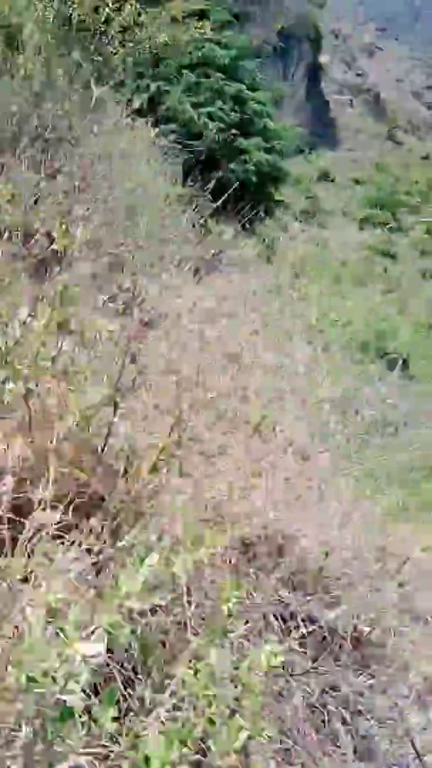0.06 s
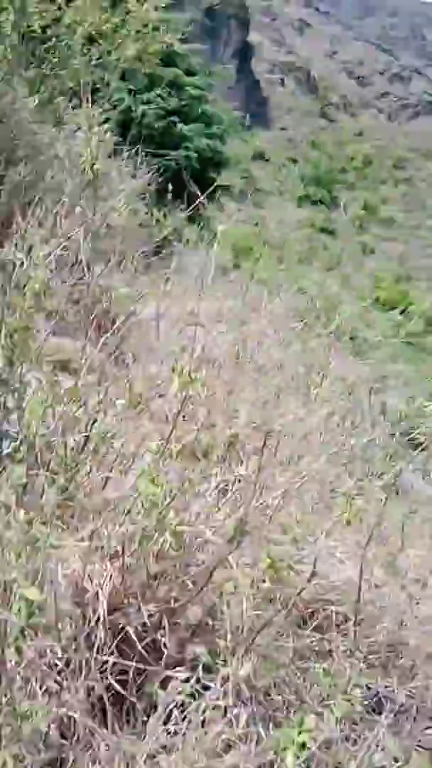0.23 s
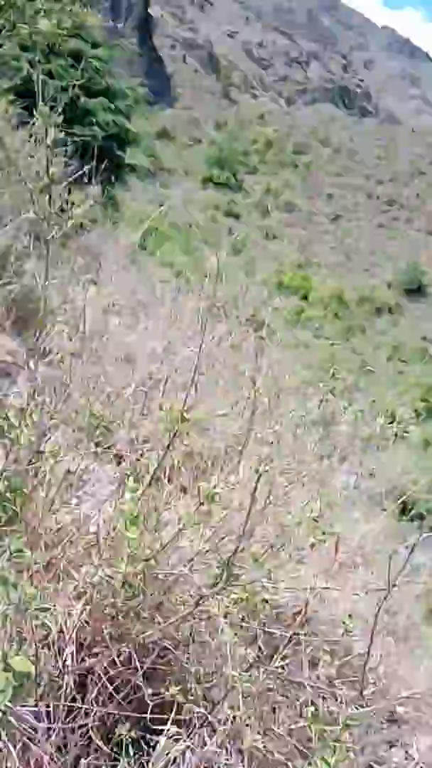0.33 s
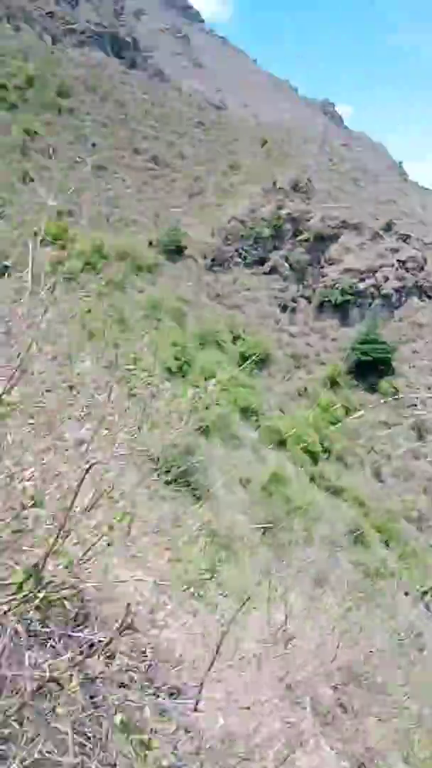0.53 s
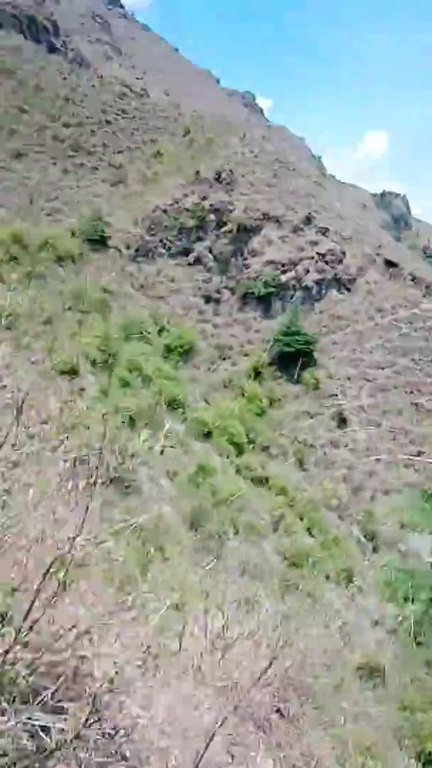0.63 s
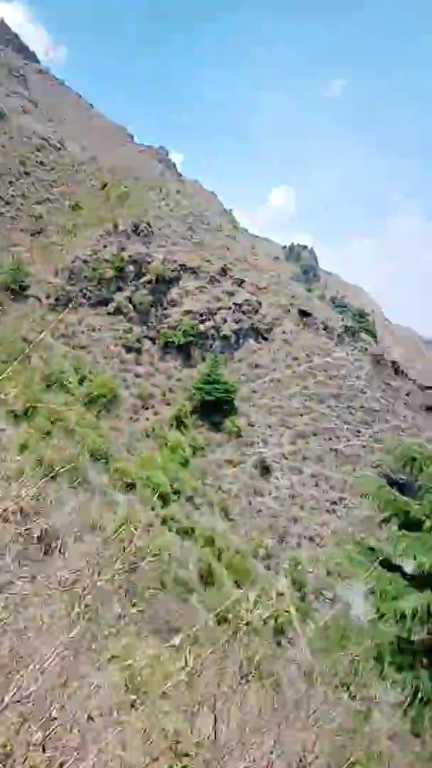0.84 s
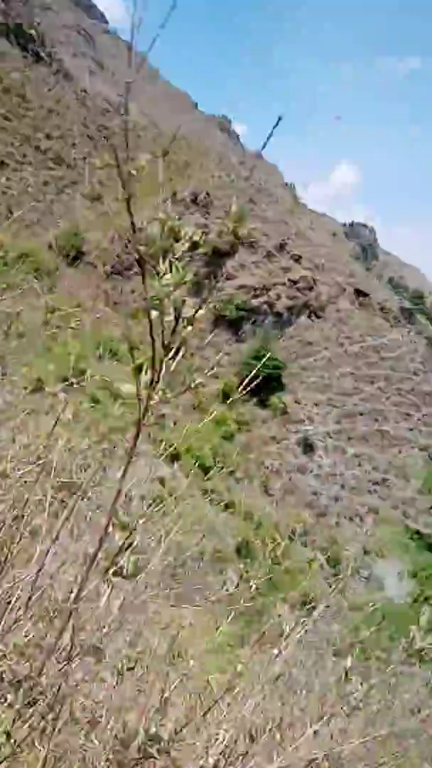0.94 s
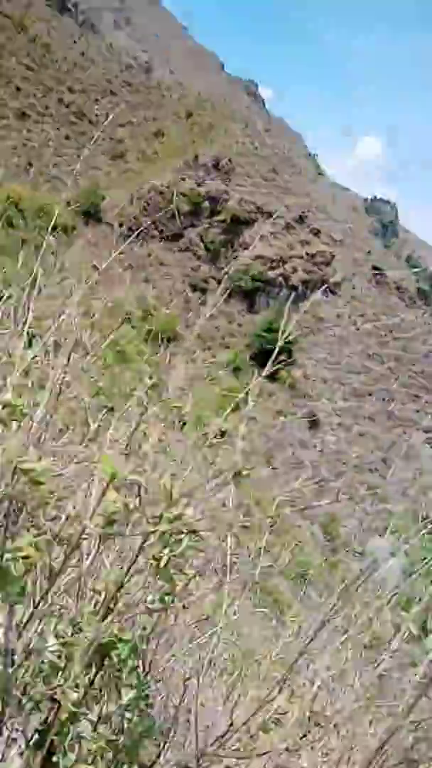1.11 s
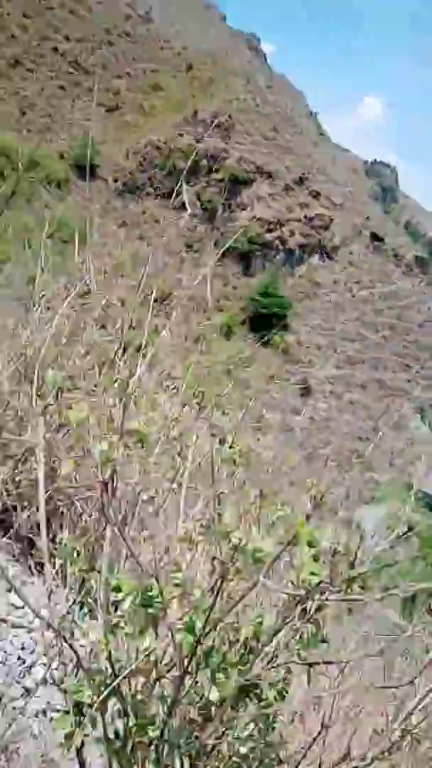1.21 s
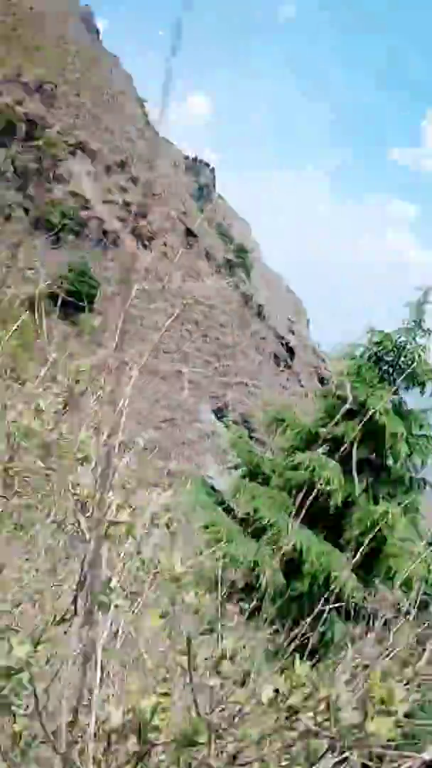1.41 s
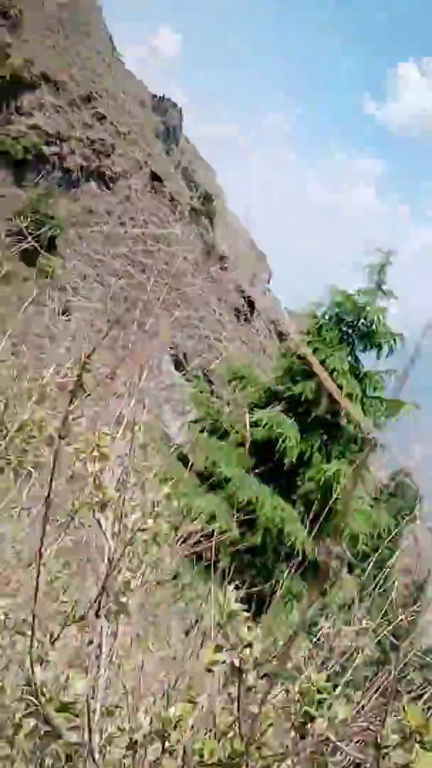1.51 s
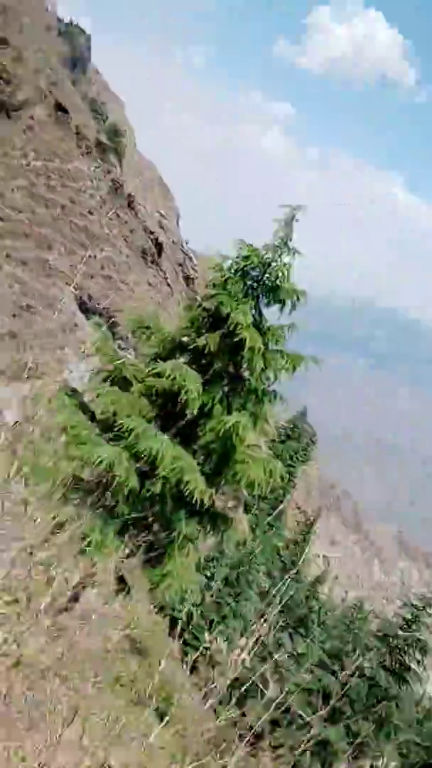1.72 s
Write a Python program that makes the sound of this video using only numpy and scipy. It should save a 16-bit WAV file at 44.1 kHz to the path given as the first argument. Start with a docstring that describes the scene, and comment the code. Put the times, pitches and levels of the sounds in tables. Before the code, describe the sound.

Footsteps crunch through dry grass and brush, with twigs snapping underfoot.

```python
"""Footsteps in dry brush

Someone walks through dry grass on an open hillside, holding a phone. Each footfall crushes soil and
straw in a cloud of tiny fractures; clods thud and twigs snap, ringing in damped modes. Friction makes
the grass swish, stems scratch and soles scuff. Wind rumbles faintly, and one knock thumps the phone."""
import sys
import numpy as np
from scipy import signal
from scipy.fft import rfft, irfft, next_fast_len
from scipy.io import wavfile
from scipy.ndimage import map_coordinates

SR = 44100
rng = np.random.default_rng(int(sys.argv[2]) if len(sys.argv) > 2 else 0)


def generate_wav(signal):
    """Clip the signal to [-1, 1] and save it as 16-bit WAV at the path in sys.argv[1]."""
    frames = np.transpose(np.atleast_2d(signal))
    scaled = np.clip(frames, -1, 1) * 32767
    pcm = np.round(scaled).astype(np.int16)
    wavfile.write(sys.argv[1], SR, pcm)


N = 77175

# Crunches underfoot. Each row: start, attack, hold and time to fall 20 dB, all in seconds,
# levels of soil, stalks and straw in dB, pitch factor of soil and stalks.
CRUNCHES = [(0, .015, .12, .05, -57, -67, -71, 1.04), (.187, .008, .05, .055, -58, -51, -57, 1),
            (.207, .004, .014, .02, -44, -45, -52, 1.03), (.49, .05, .06, .07, -54, -53, -63, 1),
            (.546, .006, .018, .022, -44, -41, -50, 1), (.585, .004, .02, .06, -50, -51, -58, .97),
            (.633, .004, .016, .02, -50, -50, -56, 1), (.666, .003, .016, .035, -47, -46, -53, 1),
            (.70, .02, .11, .05, -67, -64, -69, 1), (.846, .008, .046, .025, -51, -49, -55, .95),
            (1.036, .016, .045, .07, -61, -53, -55, .9), (1.15, .07, .05, .09, -61, -56, -63, 1.05),
            (1.226, .005, .002, .004, -46, -39, -47, .9), (1.315, .028, .026, .025, -60, -51, -53, 1.06),
            (1.38, .01, .036, .03, -56, -55, -57, 1), (1.43, .01, .05, .07, -59, -61, -68, 1)]
# Grass against the legs. Each row: time in seconds, rustle level in dB, hiss level in dB.
SWISH_LEVELS = [(0, -63, -62), (.23, -60, -61), (.325, -66, -66), (.405, -65, -65), (.54, -60, -60),
                (.81, -61, -61), (.98, -57, -56), (1.26, -59, -59), (1.31, -61, -66), (1.5, -61, -63),
                (1.62, -80, -66), (1.665, -86, -79), (1.72, -77, -67)]
# Wind on the microphone. Each row: time in seconds, level in dB.
WIND_LEVELS = [(0, -73), (.12, -61), (.2, -74), (.29, -60), (.36, -63), (.48, -54), (.58, -60), (.66, -75),
               (.77, -92), (1.18, -94), (1.27, -66), (1.33, -80), (1.5, -95), (1.63, -95), (1.66, -76),
               (1.75, -68)]
# Clods that give way. Each row: start in seconds, peak level in dB, pitch factor.
CLODS = [(.0305, -42, 1.15), (.1025, -42, 1.1), (.111, -44, .95), (.125, -44, .85), (.207, -43, .85)]
# Twig snaps. Each row: start in seconds, relative levels of body, crack, tick and edge in dB,
# pitch factor.
SNAPS = [(.0307, -52, -54, -50, -36, 1), (.0735, -54, -40, -44, -52, 1.1), (.1036, -54, -44, -46, -41, .85),
         (.1566, -62, -40, -38, -50, 1.1), (.3403, -54, -35, -38, -42, 1.05),
         (.3447, -49, -22, -23, -39, 1.05), (.552, -39, -33, -44, -54, 1), (.7105, -58, -34, -52, -62, 1.1),
         (.85, -41, -38, -39, -48, 1), (.896, -38, -28, -45, -58, .82), (1.036, -39, -36, -48, -56, .95),
         (1.059, -29, -26, -48, -62, .9), (1.081, -41, -40, -37, -52, 1), (1.145, -62, -44, -38, -35, 1.05),
         (1.2313, -39, -28, -33, -43, 1), (1.2328, -35, -19, -26, -42, .94),
         (1.123, -52, -39, -48, -56, .9), (.449, -52, -42, -56, -60, 1.05), (1.355, -58, -46, -31, -52, 1),
         (1.3917, -48, -32, -32, -45, 1), (1.4172, -49, -33, -28, -47, 1.02)]
# Stems scratching past. Each row: start in seconds, time to fall 20 dB in seconds, level in dB.
SCRATCHES = [(.103, .02, -51), (.198, .012, -48), (.337, .007, -37), (1.15, .013, -43), (1.167, .015, -50),
             (1.199, .011, -42), (1.2565, .012, -45), (1.272, .012, -50), (1.4645, .017, -47),
             (1.478, .022, -50), (1.493, .02, -53)]
# Drags of the sole. Each row: start, attack, hold and time to fall 20 dB, all in seconds,
# levels of the hollow note and the rasp in dB.
SCUFFS = [(.405, .075, .06, .05, -56, -55), (1.5, .02, .1, .06, -88, -72), (1.665, .04, .04, .05, -85, -65)]

# Spectra of the noisy sources. Each row: frequency in Hz, relative level in dB.
SOIL_SPECTRUM = [(50, -48), (130, -12), (200, -3), (300, 0), (420, -2), (550, 1), (760, -4), (950, -9),
                 (1150, -8), (1600, -22), (4000, -50)]
STALK_SPECTRUM = [(100, -60), (500, -35), (1000, -15), (1350, -9), (1700, -5), (2080, 0), (2400, 1),
                  (2750, -6), (3200, -13), (4500, -26), (9000, -50)]
STRAW_SPECTRUM = [(200, -55), (1500, -30), (3200, -9), (4100, 0), (5000, -5), (6500, -6), (7300, -19),
                  (8500, -23), (10500, -16), (16000, -19)]
RUSTLE_SPECTRUM = [(90, -50), (200, -21), (320, -10), (550, -1), (950, -2), (1700, -2), (2350, 5.5),
                   (3200, -4), (4200, 0), (5500, -2), (6600, -4), (7400, -14), (16000, -24)]
HISS_SPECTRUM = [(200, -45), (3600, -8), (5400, 1), (6600, -1), (7300, -7), (8500, -9), (10300, 0),
                 (13500, -3), (15400, -1)]
WIND_SPECTRUM = [(15, -44), (35, -21), (58, 0), (85, -1), (120, -4), (175, -20), (300, -48), (1500, -80)]
STEM_SPECTRUM = [(150, -32), (1200, -12), (2400, -1), (3300, -5), (6300, 0), (8200, -13), (10200, 0),
                 (13500, -1), (15300, 4)]
HOLLOW_SPECTRUM = [(100, -45), (300, -25), (440, -11), (530, 0), (620, -9), (800, -13), (1200, -27),
                   (4000, -55)]
RASP_SPECTRUM = [(300, -45), (1200, -22), (1750, -13), (2050, 0), (2400, -1), (2800, -10), (3400, -21),
                 (9000, -45)]

# Modes of a clod, then of the four parts of a snap from low to high. Each row: frequency in Hz at
# pitch factor 1, relative level in dB, time to fall 60 dB in seconds.
CLOD_MODES = [(225, 0, .018), (340, -6, .012)]
BODY_MODES = [(390, -6, .011), (540, 0, .014), (760, -7, .008)]
CRACK_MODES = [(1130, -14, .006), (1500, -10, .007), (2060, 0, .009), (2420, -2, .009), (2950, -9, .005)]
TICK_MODES = [(3800, 0, .005), (4450, -1, .004), (5400, -5, .0035), (6300, -5, .004)]
EDGE_MODES = [(10200, 0, .003), (12200, -3, .002), (14300, -1, .003)]


def undb(db):
    """Amplitude grows tenfold for every 20 dB."""
    return 10 ** (np.asarray(db) / 20)


def unit(x):
    """Normalisation to an rms of 1."""
    return x / np.sqrt(np.mean(x ** 2))


def curve(points):
    """Gain over time, interpolated in decibels between (s, dB) points."""
    return undb(np.interp(np.arange(N) / SR, *np.array(points).T))


def colour(x, spectrum):
    """A minimum-phase filter imposes a spectrum on the excitation; the result has rms 1."""
    hz, db = np.array(spectrum).T
    size = 2 * next_fast_len(N)
    freqs = np.maximum(np.arange(size // 2 + 1) * SR / size, 1)
    magnitude = undb(np.interp(np.log(freqs), np.log(hz), db))
    cepstrum = irfft(np.log(magnitude))
    cepstrum[1:size // 2] *= 2  # folding onto positive time makes the filter causal
    cepstrum[size // 2 + 1:] = 0
    response = np.exp(rfft(cepstrum))
    return unit(irfft(rfft(x, size) * response)[:N])


def wander(per_s):
    """Slow noise of rms 1, interpolated between random values."""
    points = rng.standard_normal(N)
    return unit(np.interp(np.arange(N) / SR * per_s, np.arange(N), points))


def resample(x, speed):
    """Reading a signal faster raises all its frequencies in proportion."""
    return map_coordinates(x, [np.cumsum(speed)], mode="mirror")


def waver(x, depth=.025):
    """Frequency modulation: resonances drift up and down as the contact moves."""
    return resample(x, 1 + depth * wander(per_s=25))


def grains(per_s, spread_db):
    """Shot noise of rms 1: tiny fractures are impulses of random time, size and sign."""
    sizes = undb(spread_db * np.clip(rng.standard_normal(N), -2, 2))
    occurs = rng.random(N) < per_s / SR
    return unit(occurs * sizes * rng.choice([-1, 1], N))


def envelope(start, attack, hold, release):
    """A linear rise and a hold, then exponential decay of 20 dB per release time."""
    t = np.arange(N) / SR - start
    return np.clip(t / attack, 0, 1) * undb(-20 * np.maximum(t - attack - hold, 0) / release)


def ring(modes, pitch):
    """Free vibration is a sum of damped modes, radiating little below the lowest; the peak is 1."""
    t = np.arange(SR // 20) / SR
    vibration = sum((-1) ** k * undb(db - 60 * t / t60) * np.sin(2 * np.pi * hz * pitch * t)
                    for k, (hz, db, t60) in enumerate(modes))
    cutoff_hz = .72 * modes[0][0] * pitch
    radiated = signal.lfilter(*signal.butter(3, cutoff_hz, "high", fs=SR), vibration)
    return radiated / np.abs(radiated).max()


def place(sound, start):
    """A pure delay sets a short sound at its start in seconds."""
    return np.interp(np.arange(N) - start * SR, np.arange(len(sound)), sound, left=0, right=0)


def footfalls(clump_db=1.8):
    """Brittle fracture: soil, stalks and straw break in clumps, and overlapping crunches add in power."""
    rows = np.array(CRUNCHES)
    power = np.array([envelope(*row[:4]) ** 2 for row in rows])
    # Each patch of ground has its own pitch; overlaps take the power-weighted mean.
    pitch = np.average(rows[:, 7:], axis=0, keepdims=True) if len(rows) == 1 else None
    weights = power + 1e-12
    pitch = rows[:, 7] @ weights / weights.sum(axis=0)
    soil = colour(grains(per_s=2500, spread_db=4), SOIL_SPECTRUM)
    fractures = grains(per_s=3000, spread_db=4)
    stalks = waver(colour(fractures, STALK_SPECTRUM))
    straw = colour(fractures, STRAW_SPECTRUM)
    layers = np.array([resample(soil, pitch), resample(stalks, pitch), straw])
    gains = np.sqrt(undb(rows[:, 4:7]).T ** 2 @ power)
    clumps = unit(undb(clump_db * wander(per_s=190)))
    return (layers * gains).sum(axis=0) * clumps


def grass(clump_db=1.6):
    """Friction between blades makes a rustle and a fine hiss, sprinkled with crackles."""
    friction = grains(per_s=5000, spread_db=6) + .7 * rng.standard_normal(N)
    crackles = .55 * grains(per_s=110, spread_db=4)
    rub = (friction + crackles) * undb(clump_db * wander(per_s=110))
    levels = np.array(SWISH_LEVELS)
    rustle = colour(rub, RUSTLE_SPECTRUM) * curve(levels[:, [0, 1]])
    hiss = colour(rub, HISS_SPECTRUM) * curve(levels[:, [0, 2]])
    return rustle + hiss


def wind():
    """Turbulence in light air buffets the microphone with low-frequency pressure noise."""
    return colour(rng.standard_normal(N), WIND_SPECTRUM) * curve(WIND_LEVELS)


def clods():
    """Lumps of earth give way; heavy damping of their low modes leaves a soft thud."""
    return sum(undb(db) * place(ring(CLOD_MODES, pitch), start) for start, db, pitch in CLODS)


def twigs(gain_db=-3, splinter_gain=.14, splinter_decay_s=.0022):
    """Impulse excitation: one break and a brief spray of splinters set each twig's modes ringing."""
    t = np.arange(SR // 50) / SR
    parts = (BODY_MODES, CRACK_MODES, TICK_MODES, EDGE_MODES)
    snaps = np.zeros(N)
    for start, *part_db, pitch in SNAPS:
        splinters = rng.standard_normal(len(t)) * (rng.random(len(t)) < .5)
        fracture = splinter_gain * splinters * np.exp(-t / splinter_decay_s)
        fracture[0] = 1  # the main break
        wood = sum(undb(db) * ring(modes, pitch) for db, modes in zip(part_db, parts))
        snaps += place(signal.fftconvolve(fracture, wood), start)
    return undb(gain_db) * snaps


def stems():
    """Stick-slip friction: dry stems catch and slide off in a run of thin, bright ticks."""
    slides = sum(undb(db) * envelope(start, attack=.0006, hold=.001, release=release)
                 for start, release, db in SCRATCHES)
    return slides * colour(grains(per_s=3500, spread_db=4), STEM_SPECTRUM)


def scuffs():
    """Sliding friction of the sole on grit excites a hollow resonance and a higher rasp."""
    drag = grains(per_s=3500, spread_db=3)
    hollow = waver(colour(drag, HOLLOW_SPECTRUM))
    rasp = waver(colour(drag, RASP_SPECTRUM))
    return sum((undb(hollow_db) * hollow + undb(rasp_db) * rasp) * envelope(*timing)
               for *timing, hollow_db, rasp_db in SCUFFS)


def knock(start_s=1.2324, peak_db=-20.7, contact_s=.0034, bass_cut_hz=92):
    """A soft impact gives the phone one force pulse; the microphone's bass cut makes it a tight thump."""
    t = np.arange(SR // 20) / SR
    push = np.sin(np.pi * np.minimum(t / contact_s, 1)) ** 2
    thump = signal.lfilter(*signal.butter(4, bass_cut_hz, "high", fs=SR), push)
    return undb(peak_db) * place(thump / np.abs(thump).max(), start_s)


def scene():
    """Superposition in a free field: the close sources add in one channel, without echoes."""
    return (footfalls() + grass() + wind() + clods() + twigs() + stems() + scuffs() + knock())[None]


def record(dry):
    """Band limiting: the phone's steep low-pass filter removes the highest treble."""
    cutoff_hz = 16200
    return signal.sosfilt(signal.ellip(10, .2, 70, cutoff_hz, fs=SR, output="sos"), dry)


dry = scene()
out = record(dry)
generate_wav(out)
```